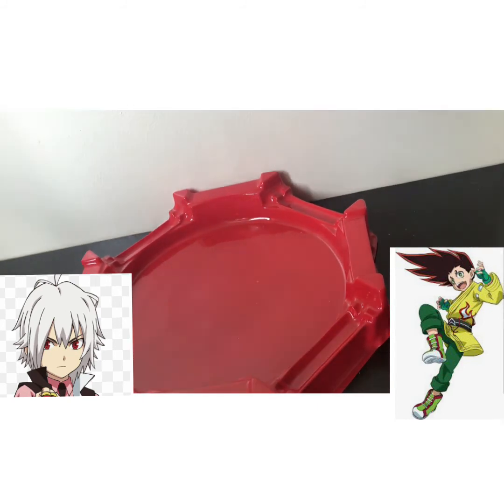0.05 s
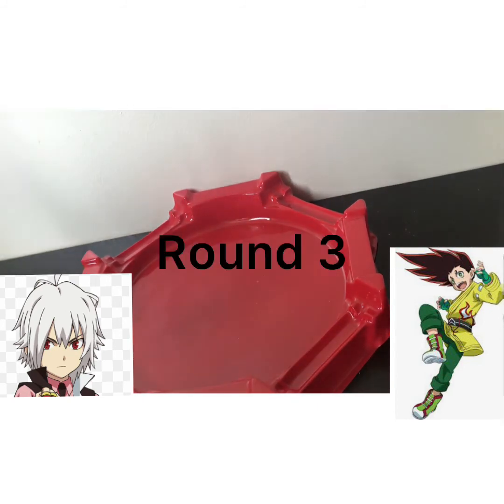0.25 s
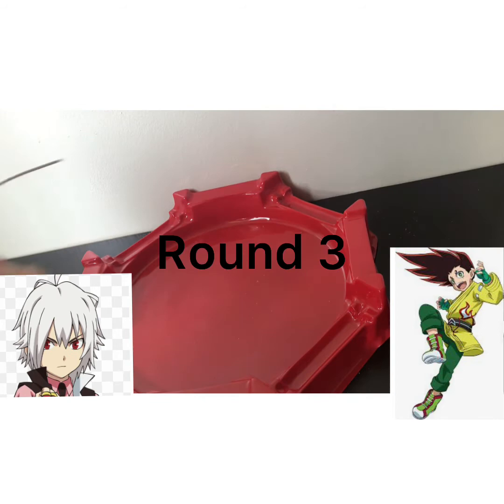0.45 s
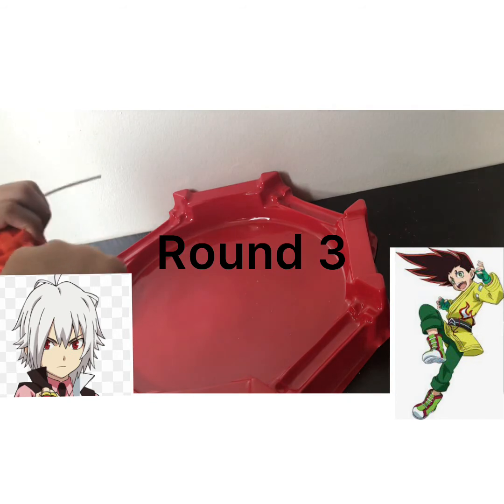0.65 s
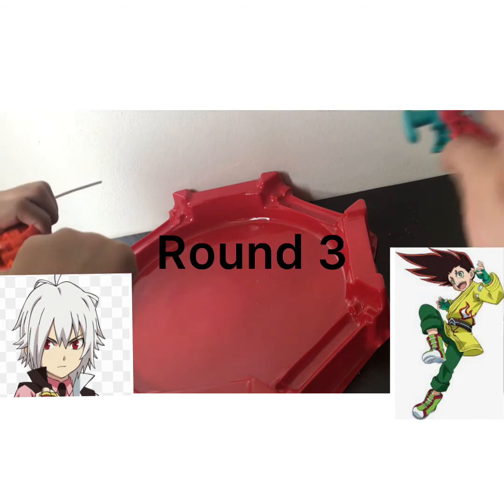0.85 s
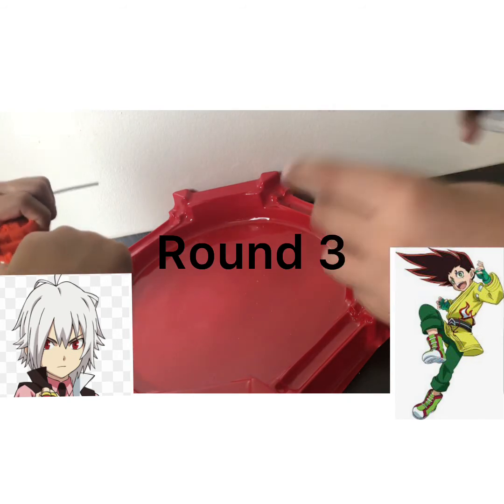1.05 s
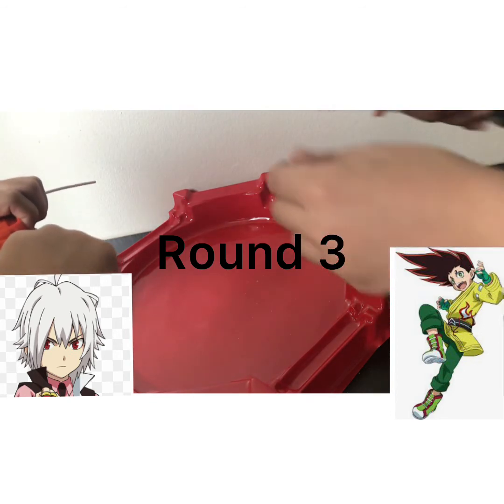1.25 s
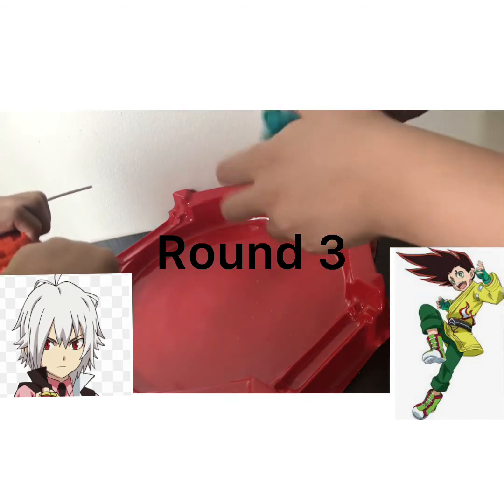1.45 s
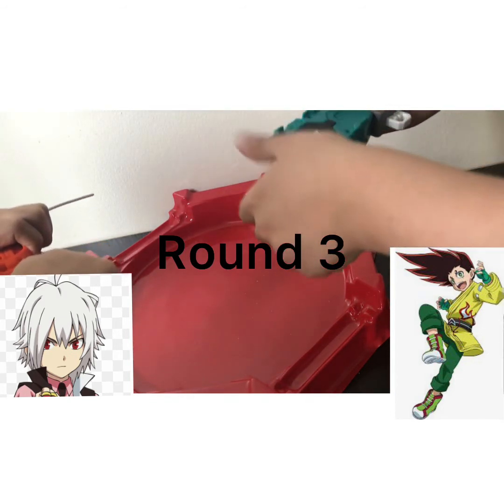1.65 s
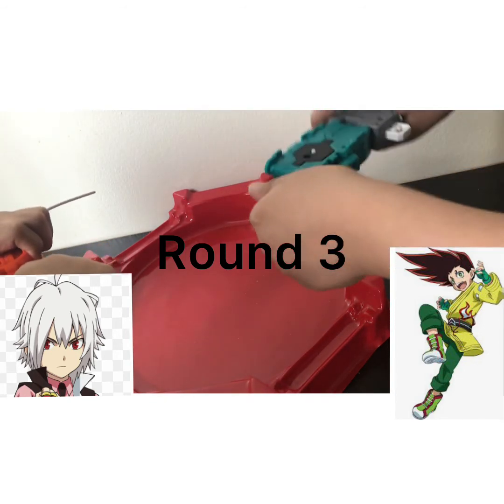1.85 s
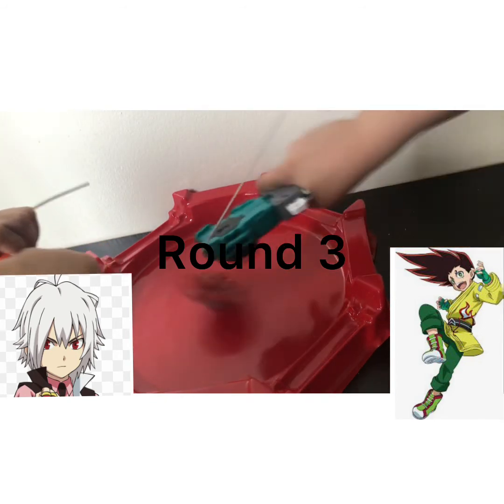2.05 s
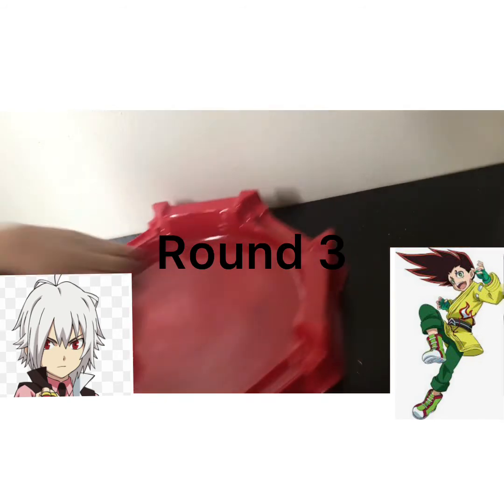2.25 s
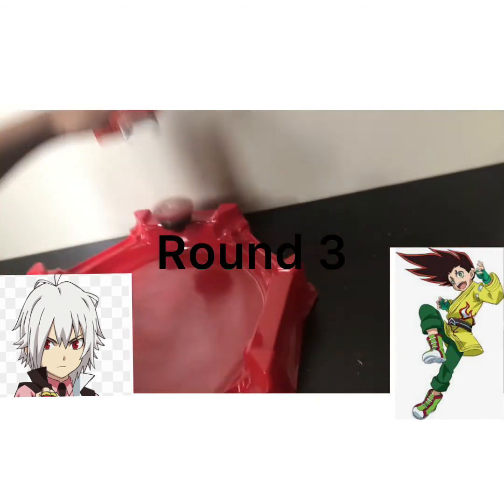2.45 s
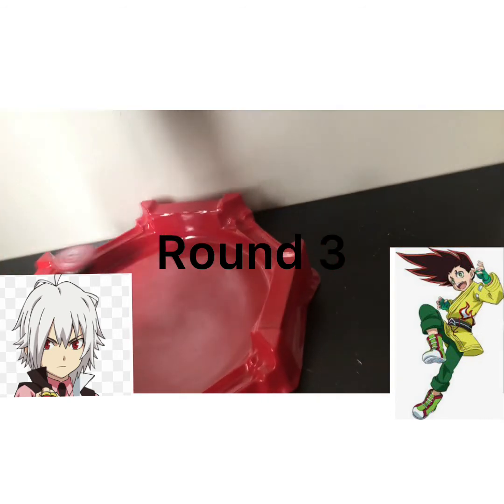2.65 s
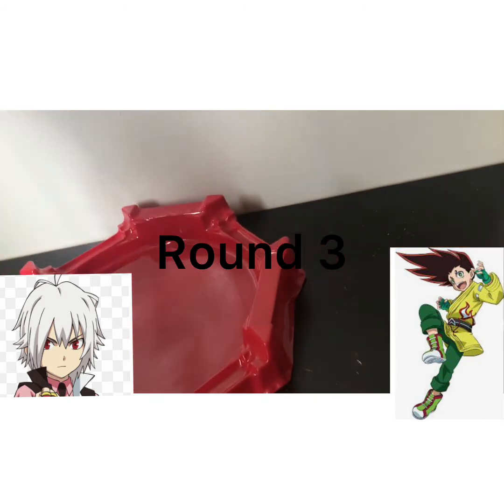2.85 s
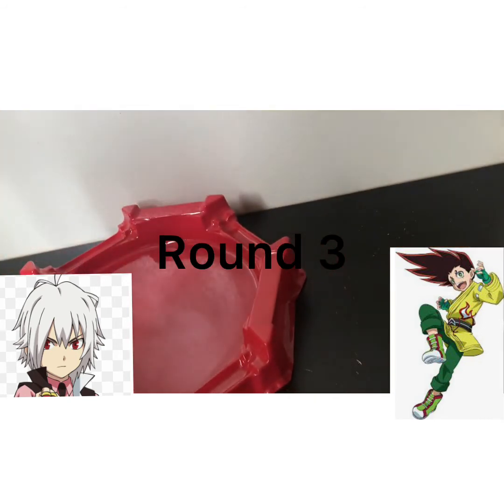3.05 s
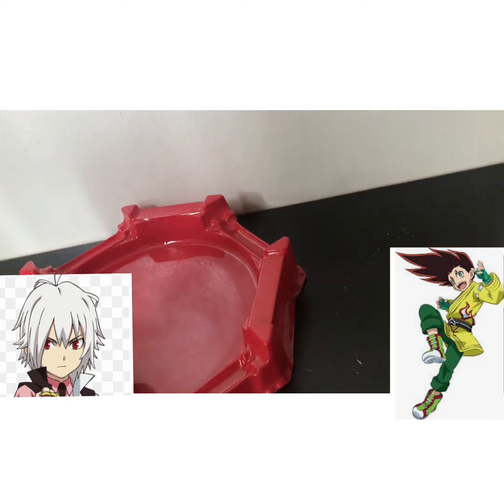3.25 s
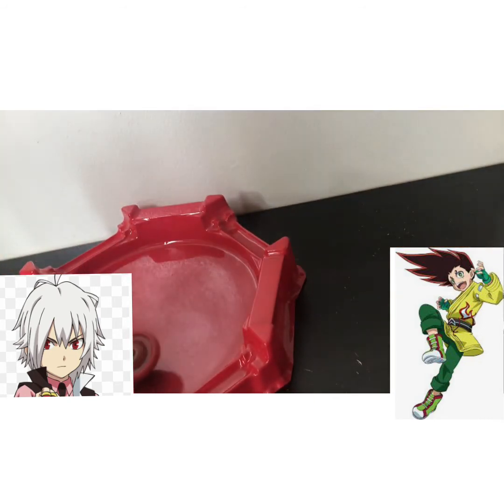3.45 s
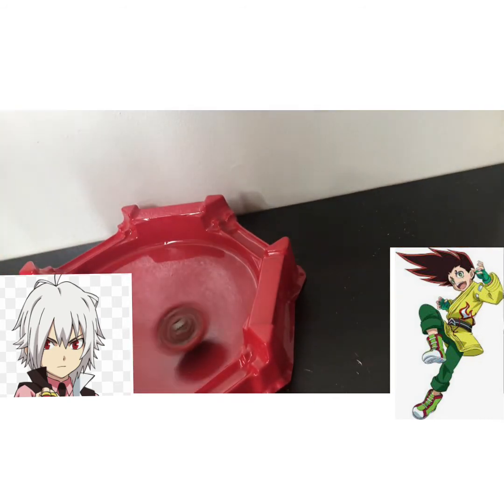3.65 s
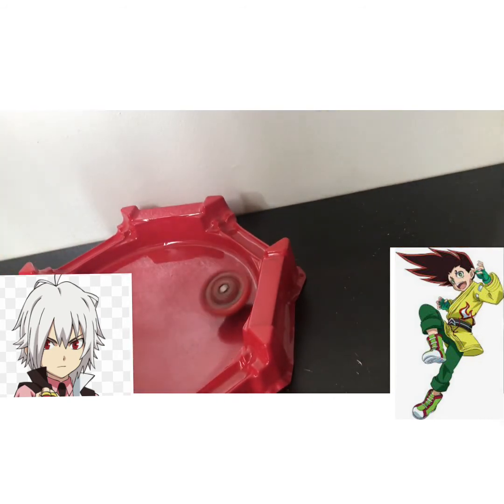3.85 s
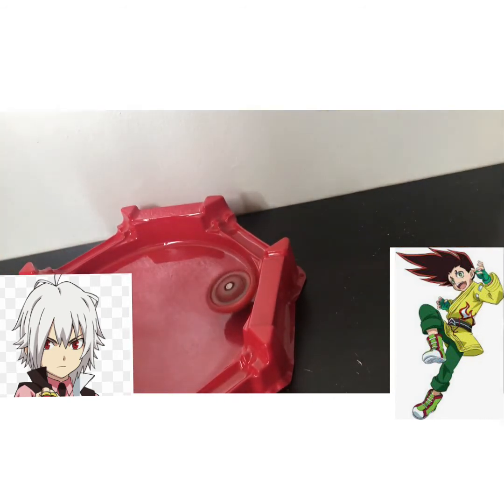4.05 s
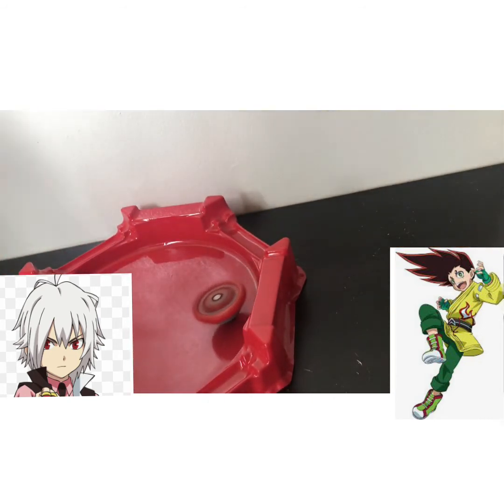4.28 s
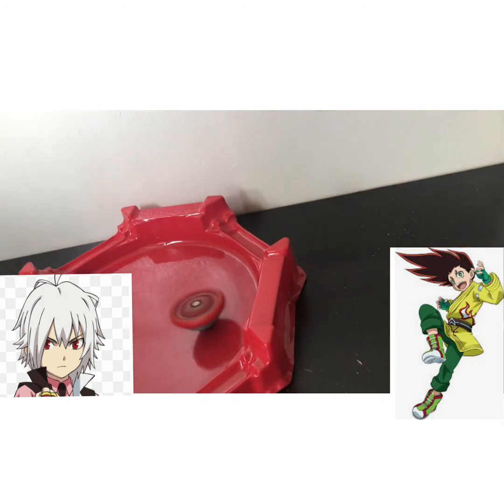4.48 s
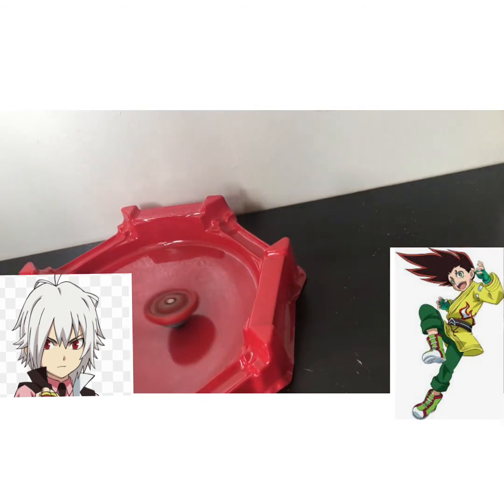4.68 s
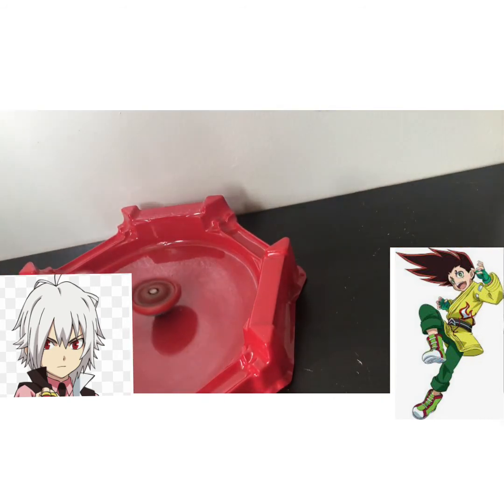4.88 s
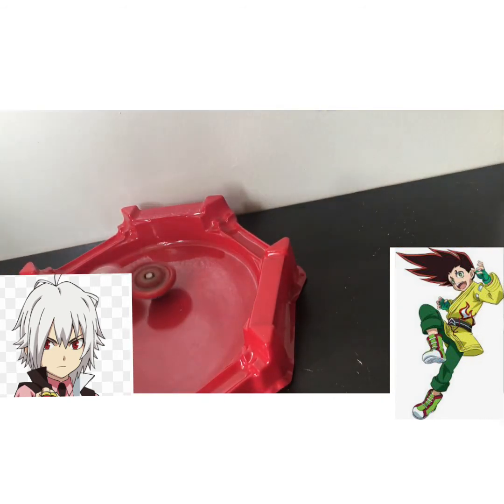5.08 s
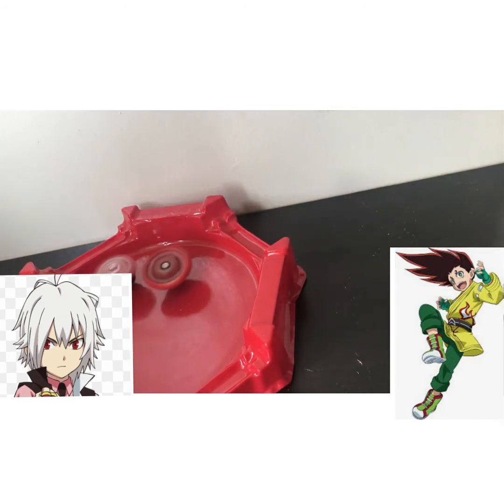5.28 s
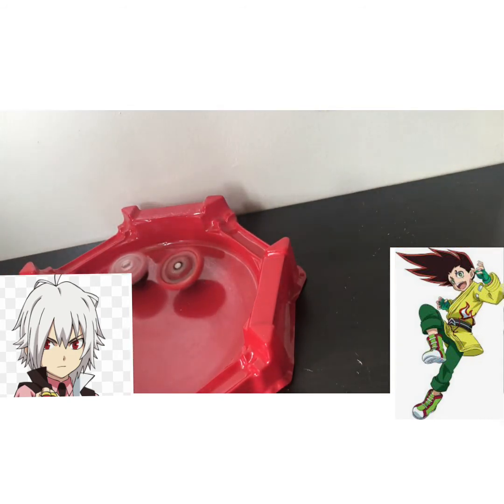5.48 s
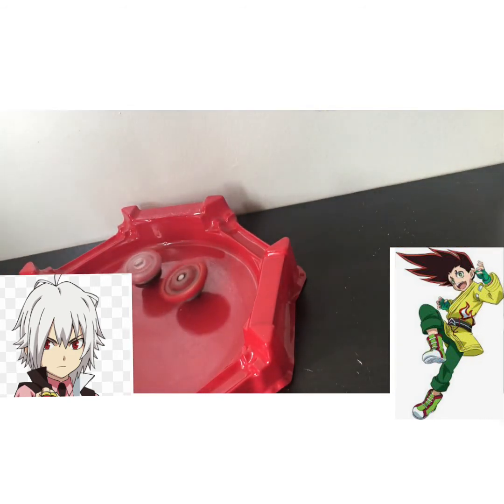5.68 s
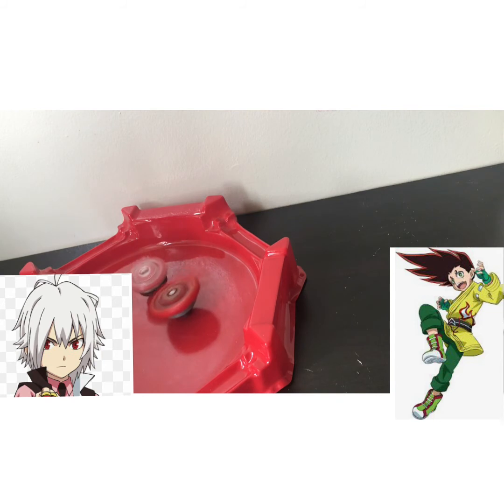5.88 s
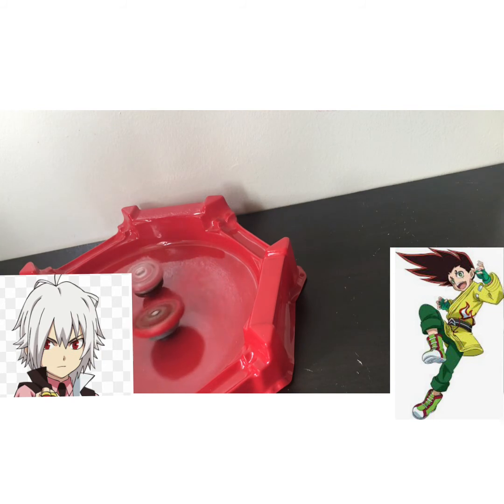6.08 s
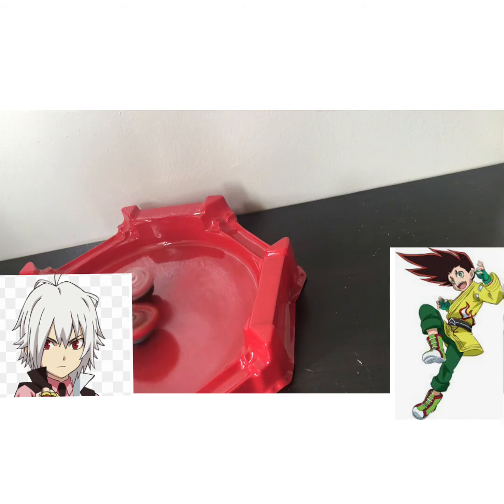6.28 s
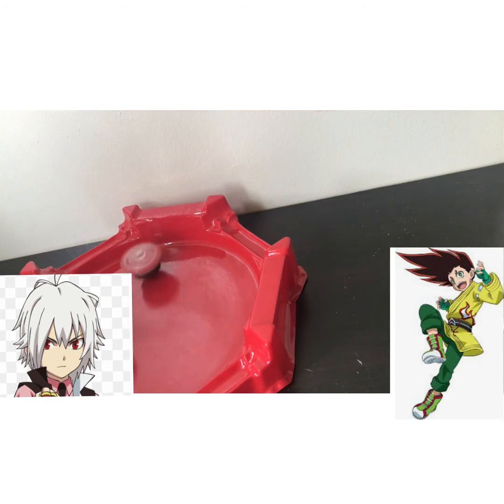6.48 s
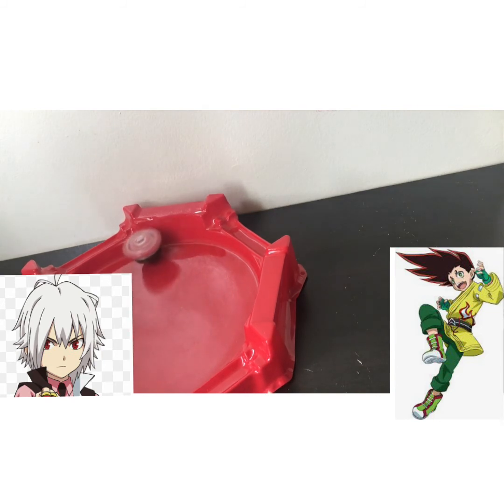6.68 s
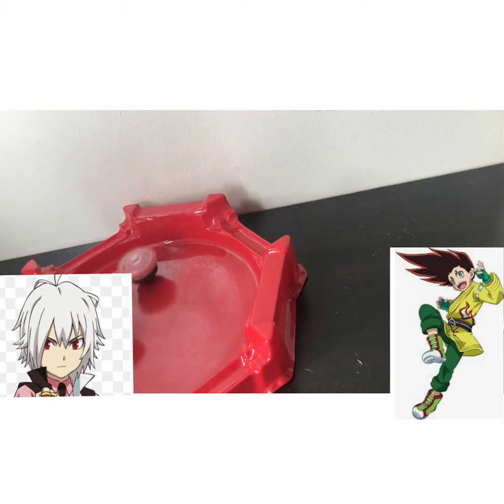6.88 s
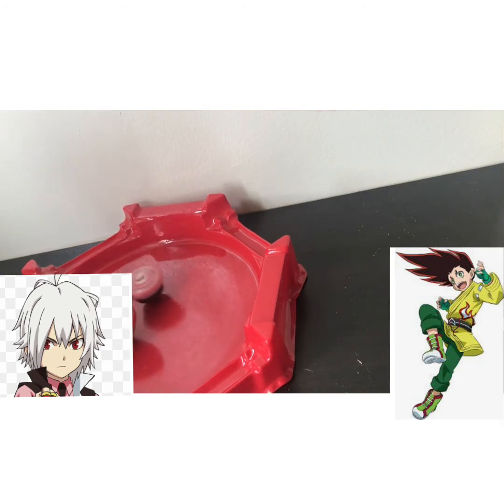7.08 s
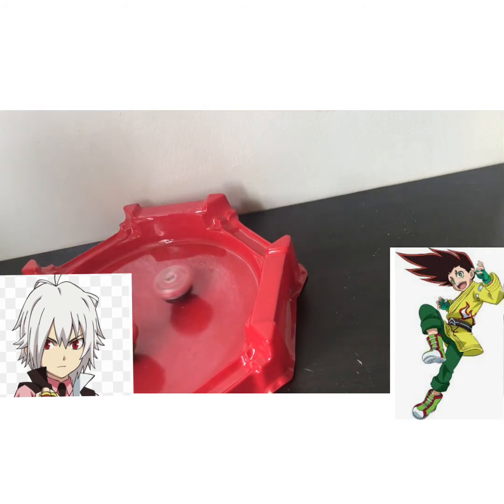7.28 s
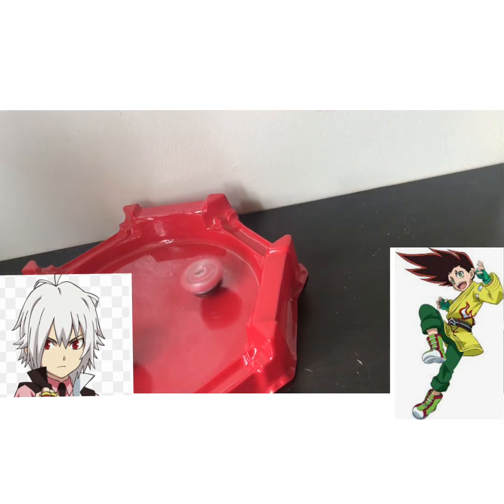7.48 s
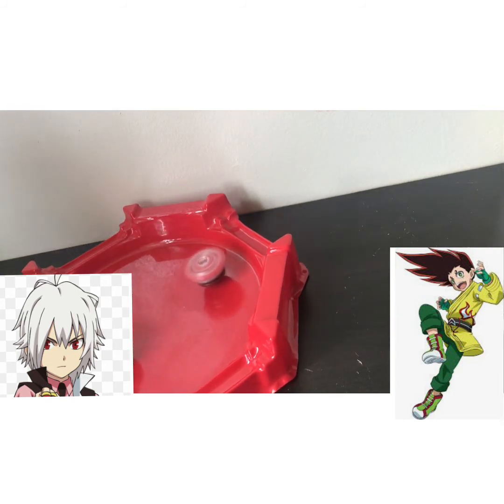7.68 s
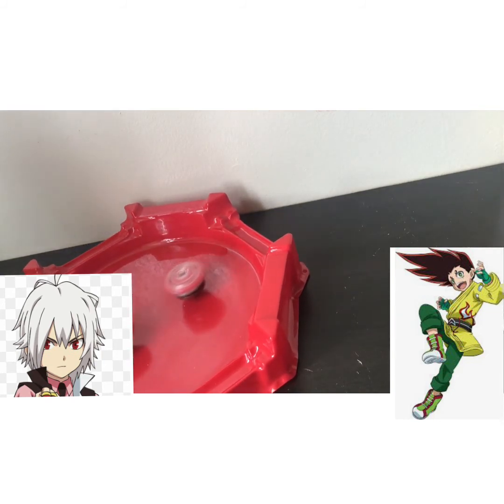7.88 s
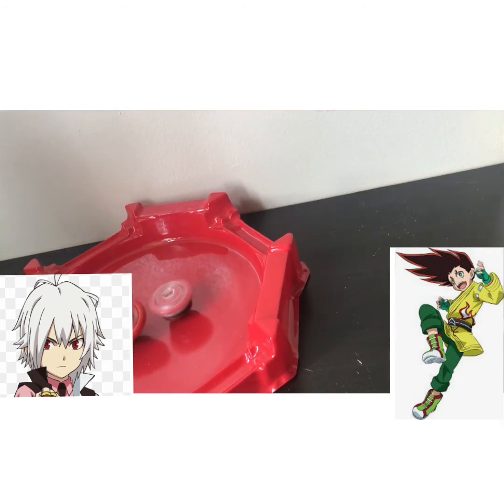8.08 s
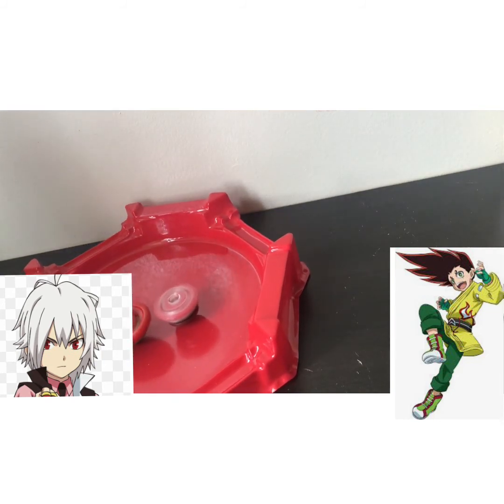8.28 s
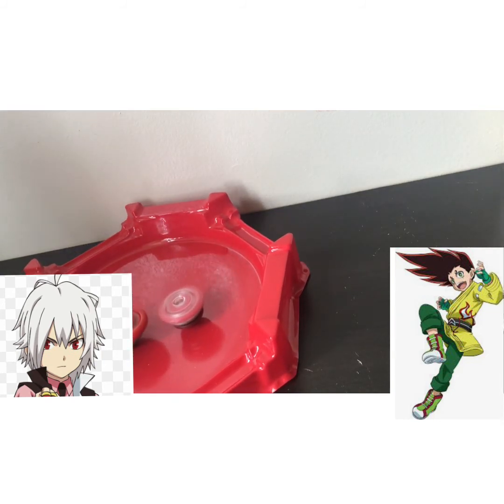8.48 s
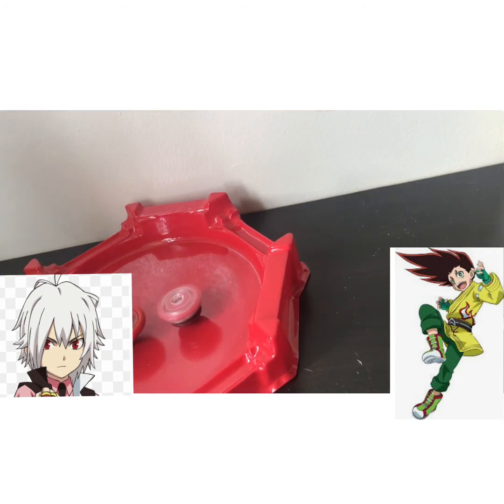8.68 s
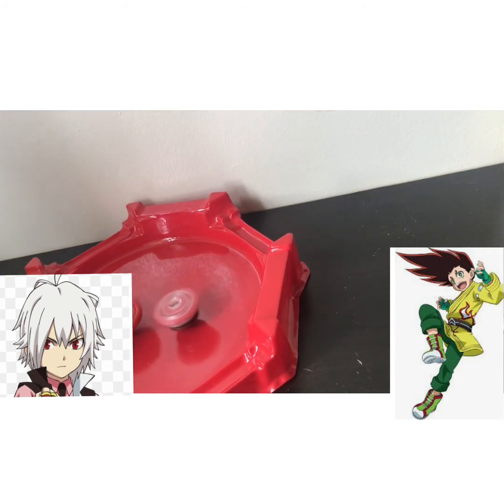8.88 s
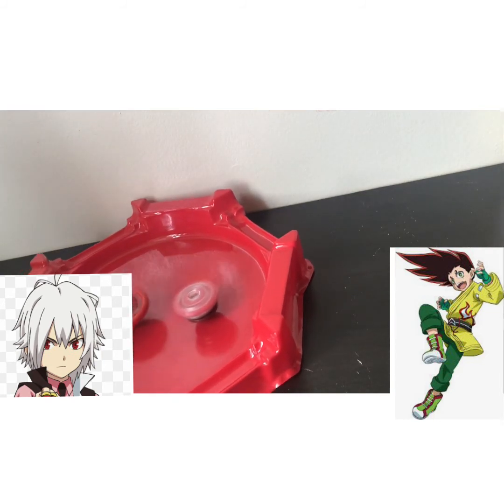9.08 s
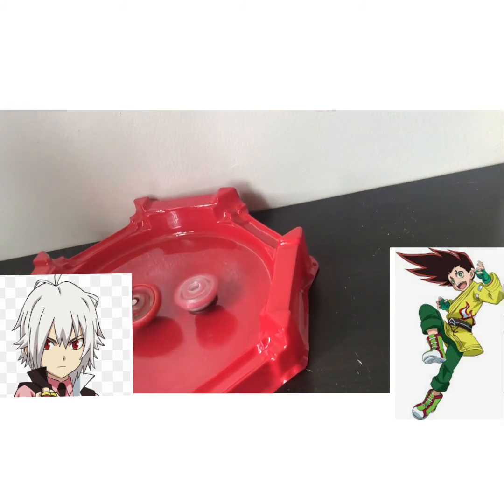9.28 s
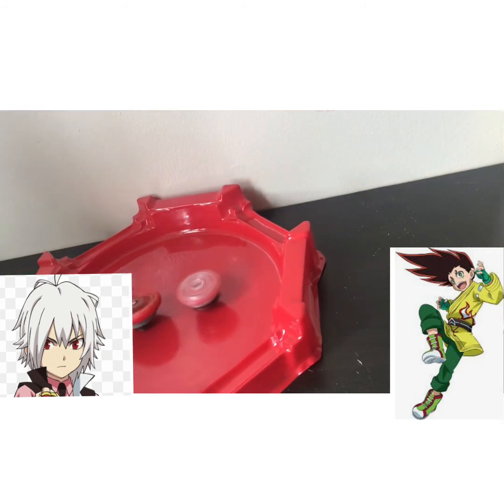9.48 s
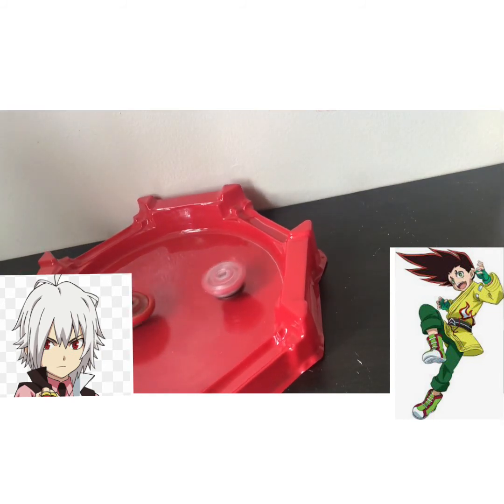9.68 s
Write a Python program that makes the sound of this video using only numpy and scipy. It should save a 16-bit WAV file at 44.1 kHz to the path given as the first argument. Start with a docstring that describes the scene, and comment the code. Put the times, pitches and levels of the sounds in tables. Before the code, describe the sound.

Brief plastic squeaks, loud zipping gear rips and a burst of hard knocks, followed by spaced, bright clashes and fine ticking of tops.

```python
"""Battling spinning tops

Two plastic tops in a thin plastic arena on a table, heard up close through a phone in a small quiet room.
A launcher squeaks as it is wound (gliding tones) and two launchers rip (bursts of clicks from gear teeth).
The tops land, clash and knock the rim: short noise pushes make the top, the arena and the table ring.
Wobbling tops tick once a turn, rubbing plastic drones and hisses, and soft room noise lies underneath."""
import sys
import numpy as np
from scipy import signal
from scipy.fft import rfft, irfft
from scipy.io import wavfile
from scipy.ndimage import uniform_filter1d

SR = 44100
rng = np.random.default_rng(int(sys.argv[2]) if len(sys.argv) > 2 else 0)


def digitize_waveform(pressure):
    """Quantize a signal to 16-bit integers and store it at the path in sys.argv[1].

    Rows of a 2-D input are taken as channels; values are limited to [-1, 1].
    """
    field = np.atleast_2d(pressure).T
    bounded = np.clip(field, -1, 1)
    quanta = np.round(bounded * 32767).astype(np.int16)
    wavfile.write(sys.argv[1], SR, quanta)


N = 429534  # length in samples


def undb(db):
    """Turns decibels into an amplitude factor."""
    return 10 ** (np.asarray(db) / 20)


def level(x, db):
    """Sets the average (RMS) level of a sound."""
    return x * undb(db) / np.sqrt(np.mean(x ** 2))


def colour(x, points):
    """Makes some pitches stronger than others, following (frequency [Hz], level [dB]) points."""
    hz, db = np.transpose(points)
    f = np.maximum(np.arange(len(x) // 2 + 1) * SR / len(x), 1)
    gain = undb(np.interp(np.log(f), np.log(hz), db))
    return irfft(rfft(x) * gain, len(x))


def walk(rate):
    """Wandering random curve: a new value every 1 / rate seconds, with the steps smoothed twice."""
    k = int(SR / rate)
    steps = np.repeat(rng.standard_normal(N // k + 1), k)
    return uniform_filter1d(uniform_filter1d(steps, k), k)[:N]


def decay(t, t60):
    """Dying away by 60 dB in t60 seconds."""
    return np.exp(-np.log(1000) * t / t60)


def bandpass(x, low_hz, high_hz):
    """Keeps the sound between two frequencies."""
    return signal.sosfilt(signal.butter(2, [low_hz, high_hz], "band", fs=SR, output="sos"), x)


def add(out, s, sound, peak_db):
    """Adds a sound at s seconds, scaled to the given peak level."""
    i = int(s * SR)
    scaled = sound * undb(peak_db) / np.abs(sound).max()
    out[i:i + len(sound)] += scaled[:len(out) - i]


# tone of the quiet room: (frequency [Hz], relative level [dB])
AIR = [(12, -51.5), (20, -20.5), (49, -14.5), (86, -3), (168, -15), (182, -31), (228, -14), (328, -23.5),
       (367, -27), (499, -30), (718, -28.5), (849, -41.5), (2320, -45.5), (16000, -58)]
AIR_DB = -51.5  # average level


def air():
    """Steady room tone: random noise coloured to be strongest in the bass."""
    return level(colour(rng.standard_normal(N), AIR), AIR_DB)


# echo of the room: (centre of the band [Hz], time to fall 60 dB [s], echo level [dB])
ROOM = [(150, .33, -8), (500, 0.21, -7), (1450, 0.18, -9.5), (3717, 0.34, -10.5), (9700, 0.13, -9.5)]


def room(x):
    """Blurred echo off the room: noise in several bands, each dying at its own pace, fading in at the start."""
    t = np.arange(SR // 2) / SR
    octave = np.log2(np.maximum(np.arange(len(t) // 2 + 1) * SR / len(t), 1))
    centres = np.log2(np.array(ROOM)[:, 0])
    echo = 0
    for share, (_, t60, db) in zip(np.eye(len(ROOM)), ROOM):
        # neighbouring bands cross-fade at constant power
        weight = np.sqrt(np.interp(octave, centres, share))
        band = irfft(rfft(rng.standard_normal(len(t))) * weight, len(t))
        # the last factor keeps a long echo from being louder overall than a short one
        echo = echo + undb(db) * band * decay(t, t60) / np.sqrt(t60 * SR / 14)
    fade_in = np.clip(t / 0.0036 - .3, 0, 1)
    return signal.fftconvolve(x, echo * fade_in)[:N]


# rough tail after a blow: start level against the blow in the arena (drone) and in the top (hiss),
# time to fall 60 dB
TAIL_DRONE_DB, TAIL_HISS_DB, TAIL_T60_S = -26.5, -38.5, 0.36


def rough_tail(column, below_db):
    """Strength of the rough tail after each blow: low drone and hiss that die away with the blow."""
    out = np.zeros(N)
    fade = decay(np.arange(SR) / SR, TAIL_T60_S)
    for blow in BLOWS:
        add(out, blow[0], fade, blow[column] + below_db)
    return uniform_filter1d(out, size=400)  # softens the start over about 9 ms


# tips and hands rubbing on plastic: (time [s], drone in the shell [dB], hiss [dB])
RUBBING = [(0, -58, -58), (.35, -60.5, -55), (.7, -62, -55), (.89, -67.5, -65), (1.36, -58.5, -60),
           (1.52, -72, -71), (1.85, -60, -60), (2.55, -42, -37), (2.9, -48.5, -59.5), (3.4, -61.5, -62),
           (4.37, -61.5, -58.5), (5.07, -55, -56.5), (5.5, -61, -63.5), (5.81, -46.5, -57),
           (5.97, -64, -62.5), (6.54, -58, -57.5), (7.32, -60, -65), (8.65, -67, -68.5), (8.95, -53, -61),
           (9.44, -57.5, -61.5), (9.74, -61, -65)]
# drone of the arena shell: (frequency [Hz], relative level [dB])
ROLLING = [(210, -43), (350, -8), (645, -5.5), (958, 2.5), (2170, -9.5), (2290, -13.5), (2480, -13),
           (3000, -14.5), (3900, -42), (6600, -120)]
# hiss of the plastic: (frequency [Hz], relative level [dB])
HISS = [(880, -31.5), (1500, 2), (2080, -7.5), (3350, -1.5), (4920, -5), (5600, -3.5), (8660, -7.5),
        (12900, -12.5), (16000, -25.5)]


def rubbing_and_tails():
    """Rubbing shakes the shell in grains and hisses; the rough tails of the blows share this drone and hiss."""
    s, drone_db, hiss_db = np.transpose(RUBBING)
    t = np.arange(N) / SR
    grains = rng.standard_normal(N) * undb(4.5 * walk(70))
    drone = level(colour(grains, ROLLING), 0)
    flutter = rng.standard_normal(N) * undb(2.0 * walk(90))
    hiss = level(colour(flutter, HISS), 0)
    # the drone tail follows the arena level of each blow, the hiss tail the level of the top
    drone_strength = undb(np.interp(t, s, drone_db)) + rough_tail(column=5, below_db=TAIL_DRONE_DB)
    hiss_strength = undb(np.interp(t, s, hiss_db)) + rough_tail(column=1, below_db=TAIL_HISS_DB)
    return drone * drone_strength + hiss * hiss_strength


# strokes of the gear teeth: (start of full strength [s], hold [s], rise over 20 dB [s], fall over 20 dB [s],
# level [dB], change of the low part [dB])
RASPS = [(0.433, .04, .04, 0.0059, -35, -4), (.57, .015, 0.049, 0.02, -27.5, -12),
         (0.63, .01, .02, 0.045, -42.5, -7), (0.69, .015, 0.041, 0.04, -33.5, 1.5),
         (1.926, .045, 0.057, 0.0362, -18.5, 0.5), (2.167, .004, .015, 0.04, -17.5, 3.5),
         (2.197, .03, 0.017, 0.0472, -17.5, -1.5), (2.237, .05, 0.011, 0.0771, -5, 0.5)]
# ring of the launcher case: (frequency [Hz], relative level [dB])
GEARS = [(240, -48.5), (400, -14), (697, -19.5), (765, -14), (964, -19.5), (1140, -14), (1250, -17),
         (3070, -7), (3420, -6), (12100, -6), (16000, -17)]


def rasps():
    """Thousands of uneven tooth clicks a second ring the launcher case; each stroke swells, holds and dies."""
    is_click = rng.random(N) < .14  # share of samples that hold a click
    clicks = rng.standard_normal(N) * is_click * undb(3.5 * walk(300))
    whole = level(colour(clicks, GEARS), 0)
    low = colour(whole, [(1500, 0), (3000, -40)])
    t, out = np.arange(N) / SR, 0
    for s, hold, rise, fall, db, low_db in RASPS:
        # 0 while held, growing before and after; each 1 means 20 dB softer
        away = np.maximum(np.maximum((s - t) / rise, (t - s - hold) / fall), 0)
        stroke = whole + (undb(low_db) - 1) * low
        out = out + undb(db - 20 * away) * stroke
    return out


# plastic squeaking on plastic: (start [s], end [s], start pitch [Hz], end pitch [Hz], lowest tone [dB],
# overtones [dB], brightest overtone [Hz])
SQUEAKS = [(.36, .383, 9200, 9400, -35, -70, 9000), (.373, 0.413, 8900, 4200, -45.5, -56, 11900),
           (0.425, .468, 1950, 3700, -37, -34, 9500), (.489, .52, 3500, 2700, -52, -37, 9100),
           (.525, 0.572, 2730, 3300, -42, -36, 7500), (.565, .584, 2740, 2740, -48, -20.5, 8100),
           (0.568, .586, 3660, 2690, -36.5, -50, 9000), (.586, .622, 2740, 2770, -58, -47, 8300),
           (0.628, 0.653, 4460, 4480, -38, -32.5, 9000), (0.653, .685, 3300, 2620, -55, -38, 5800),
           (0.663, 0.691, 2600, 2660, -38.5, -55, 6000), (0.673, 0.725, 2320, 1940, -37.5, -40, 6200),
           (1.86, 1.883, 11000, 11400, -22.5, -90, 9000)]
WAVER_HZ = 110.6  # pitch shift for a random curve value of 1
OVERTONE_DB_PER_OCTAVE = 19  # overtones weaken this fast away from the brightest one


def squeaks():
    """Fast sticking and slipping at two contact spots: gliding stacks of tones that waver and stutter."""
    out, k = np.zeros(N), np.arange(1, 5)[:, None]  # k numbers the four tones of a stack
    for spot in range(2):
        waver, stutter = walk(900) + .6 * walk(150), walk(350)
        for s0, s1, hz0, hz1, first_db, over_db, bright_hz in SQUEAKS:
            i = np.arange(int(s0 * SR), int(s1 * SR))
            hz = np.geomspace(hz0, hz1, len(i)) + WAVER_HZ * waver[i]
            octaves_off = np.abs(np.log2(k * hz / bright_hz))
            db = np.where(k == 1, first_db, over_db - OVERTONE_DB_PER_OCTAVE * octaves_off)
            tones = np.sin(k * 2 * np.pi * np.cumsum(hz) / SR)
            audible = k * hz < .4 * SR  # leaves out tones too high to play cleanly
            stack = np.sum(undb(db) * audible * tones, axis=0)
            strength = undb(6.0 * stutter[i])
            strength /= np.sqrt(np.mean(strength ** 2))
            out[i] += stack * strength * signal.windows.tukey(len(i), .3)
    return out


def contact(noise, ms, rattle_db, rattle_ms):
    """Scraping push of a spinning rim: quick rise, then it lets go while loose parts rattle on."""
    t = np.arange(len(noise)) / SR * 1000  # in ms
    rise = 1 - np.exp(-t / 0.72)
    return noise * rise * (np.exp(-t / ms) + undb(rattle_db) * np.exp(-t / rattle_ms))


def crack(push, best_hz, treble_db, focus_db):
    """Snap of hard plastic: broad noise with more or less treble and one heavily damped resonance."""
    snap = bandpass(push, 2300, 15000)
    dull = signal.sosfilt(signal.butter(2, 6500, fs=SR, output="sos"), snap)
    peak = signal.lfilter(*signal.iirpeak(best_hz, 9.0, fs=SR), push)
    middle, treble = dull + undb(focus_db) * peak, snap - dull
    return middle / np.abs(middle).max() + undb(treble_db) * treble / np.abs(treble).max()


# single light ticks of loose parts and rims: (time [s], peak level [dB], ring [Hz])
TICKS = [(.2655, -35, 6240), (.315, -27, 5960), (.323, -29.5, 4020), (.3385, -32, 5300),
         (.595, -18.5, 2900), (0.8752, -34.5, 3050), (0.8842, -33.5, 3000), (1.4451, -41, 3850),
         (1.7068, -37, 2580), (1.8522, -27, 4000), (2.502, -14, 3800), (2.5408, -18, 6500),
         (2.5516, -23, 3470), (2.7613, -13, 8550), (3.518, -38, 9180), (3.747, -36, 2640),
         (3.8583, -39, 3630), (4.8375, -39, 4480), (4.8833, -39.5, 5640), (4.9044, -44, 3070),
         (5.2144, -43, 8300), (5.504, -29, 3900), (5.524, -38, 3140), (5.678, -33, 4030),
         (5.7603, -37, 4150), (5.792, -38, 3200), (6.0286, -35, 5720), (6.0775, -43, 4580),
         (6.116, -35, 6470), (6.1906, -39, 4890), (6.2282, -42, 3050), (6.574, -33, 4470),
         (8.1077, -30, 4635), (9.5527, -28.5, 8500), (9.6257, -40.5, 4710), (9.733, -43, 5000),
         (6.8184, -31, 6600), (6.247, -43, 4700), (5.657, -42, 8500)]
# a lug on the rim of a wobbling top ticks once a turn: (first tick [s], end [s], time of a turn [s],
# first level [dB], last level [dB], ring [Hz])
WOBBLES = [(3.9938, 4.35, .0475, -29, -40, 5250), (6.686, 6.97, .0663, -45, -32, 6240),
           (6.726, 6.95, 0.064, -49, -39, 8500), (7.2914, 7.902, .0722, -38.5, -42.5, 8710),
           (7.3205, 7.93, 0.072, -40, -34, 4620), (8.462, 8.72, .0808, -46, -43.5, 5800),
           (9.093, 9.28, 0.083, -48, -44, 3700), (9.133, 9.32, 0.088, -46, -48, 4300)]
TICK_TREBLE_DB, WOBBLE_TREBLE_DB = -5.5, 1.5  # treble against the middle of the sound
WOBBLE_SCATTER_DB = 2.5  # random spread of level from tick to tick


def ticks():
    """Short dry touches that hardly move the shell: single ones, and runs of uneven strength, one per turn."""
    out = np.zeros(N)
    rows = [(*row, TICK_TREBLE_DB) for row in TICKS]
    for first, end, turn, db0, db1, hz in WOBBLES:
        scatter = WOBBLE_SCATTER_DB * rng.standard_normal(16)
        for s, extra_db in zip(np.arange(first, end, turn), scatter):
            db = db0 + (db1 - db0) * (s - first) / (end - first)
            rows.append((s, db + extra_db, hz, WOBBLE_TREBLE_DB))
    for s, db, best_hz, treble_db in rows:
        push = contact(rng.standard_normal(2048), 2.4, rattle_db=-14.5, rattle_ms=14)
        add(out, s, crack(push, best_hz, treble_db, focus_db=6), db)
    return out


BLOW_TIME = np.arange(SR // 6) / SR  # time axis of one blow [s]


def ring(modes, spread, best_hz, focus_db, noise):
    """Ring of a body: moulded plastic splits each mode into a cluster of close tones that beat unevenly."""
    hz, db, t60 = (c[:, None] for c in np.transpose(modes))
    f = np.arange(len(BLOW_TIME) // 2 + 1) * SR / len(BLOW_TIME)
    near_mode = np.exp(-((f - hz) / (spread * hz)) ** 2)
    clusters = irfft(rfft(noise) * near_mode, len(BLOW_TIME))
    clusters /= clusters.std(axis=1, keepdims=True)
    # the modes near best_hz are struck hardest
    gain = undb(db + focus_db * np.exp(-(np.log(hz / best_hz) / .1) ** 2))
    return np.sum(gain * clusters * decay(BLOW_TIME, t60), axis=0)


def body(push, response, low_hz, high_hz, knock_db):
    """A struck body: a short broad knock and the ring of its modes."""
    sound = signal.fftconvolve(push, response)
    knock = bandpass(push, low_hz, high_hz)
    sound[:len(push)] += undb(knock_db) * knock * np.abs(sound).max() / np.abs(knock).max()
    return sound


# blows: (time [s], peak of the top [dB], ring of the top [Hz], treble against the middle [dB],
# ring of the top against its peak [dB], arena peak [dB], arena ring [Hz], table thud peak [dB])
BLOWS = [(1.3292, -59, 2690, -16, -20, -56, 482, -36), (1.41, -55, 2790, -16, -20, -48, 565, -35.5),
         (1.809, -35.5, 3900, -15, -12.5, -57.5, 537, -36.5),
         (1.9315, -4.5, 3230, -15.5, -25, -30, 1900, -58),
         (1.9648, 0.5, 3160, -12, -14.5, -17.5, 2310, -38), (2.001, 1.5, 9060, -5.5, -21.5, -5, 546, -5),
         (2.1022, 1, 2750, -6, -22, 4.5, 1270, -25), (2.2405, -1, 3400, -6, -15.5, -9.5, 870, -40),
         (2.2691, 3, 8750, 1.5, -23.5, -1, 960, -23), (2.4169, -10, 2740, -9, -13.5, 2, 1100, -53),
         (2.4718, -1.5, 6950, 3.5, -19, -21, 1070, -49), (2.614, -1, 5000, -8, -27.5, -9.5, 1520, -24),
         (2.6493, -14.5, 2570, -23, -25.5, -14.5, 1020, -44),
         (2.6634, -15.5, 3300, -21, -2, -10.5, 2050, -46), (2.6806, -24, 3100, -5, -27.5, -16, 1200, -39),
         (2.7493, -11.5, 2700, -5.5, -13.5, -5.5, 1170, -24.5), (3.041, -12, 8280, 3.5, -9, -47, 1170, -36),
         (3.1028, -8.5, 4200, -10, -30, -17, 1480, -46), (3.118, -14, 2870, -8, -26, -19, 1510, -26),
         (3.3093, -6, 9000, 2.5, -18, -25, 1840, -39), (3.5425, 4.5, 9570, 1, -13.5, -26.5, 2480, -33),
         (3.6438, -15, 2780, -23, -17, -1, 950, -23), (3.912, -16, 6900, -6, -20, -13, 1624, -28.5),
         (5.0653, -0.5, 4180, -1.5, -12, -23.5, 1930, -37.5),
         (5.6925, -26.5, 3830, -9, -7, -39, 2110, -49.5), (5.875, -15, 8000, -10, -7, -24, 2380, -54),
         (5.8821, -4.5, 5800, 4.5, -20, -31, 1980, -39), (6.289, -14.5, 6220, 1, -25.5, -31, 1460, -53),
         (6.2968, 3.5, 9360, 2.5, -11.5, -14, 2570, -18), (6.36, -32, 5000, -10, -20, -31, 436, -25),
         (6.5988, -6.5, 3000, -0.5, -24, -7, 1170, -23.5), (6.984, -9, 11750, -12, -6, -42, 1560, -29.5),
         (7.007, -3.5, 12100, 6.5, -26, -23.5, 2480, -29), (7.136, -20, 3660, -8, -11, -22.5, 936, -27.5),
         (7.9748, -34, 2790, -4, -19.5, -30.5, 920, -37), (8.0183, -3.5, 11100, 7, -14, -30, 1950, -62),
         (8.3375, -11, 3400, 1, -16, -32, 2500, -44.5), (8.773, -18, 8700, 3, -16, -35.5, 1460, -39),
         (8.7827, -5, 10000, 2, -15, -25.5, 2005, -45.5), (9.2695, -43.5, 4650, -8, -20, -33.5, 963, -41.5),
         (9.3461, -12.5, 7100, 3, -15, -28.5, 2360, -57), (9.361, -14.5, 5000, 2, -25, -44, 2300, -56),
         (9.3982, -2.5, 4550, 9, -24.5, -29.5, 2500, -38)]
# modes (natural tones) of a top: (frequency [Hz], level [dB], time to fall 60 dB [s])
TOP = [(2900, -3.5, 0.084), (3376, -0.5, 0.11), (4270, -8, .22), (4600, -0.5, 0.11), (5800, -1, 0.14),
       (6540, -2.5, 0.061), (6960, -2.5, 0.07), (8500, 1.5, .08), (8900, -2, 0.12), (9700, -1, 0.097),
       (11720, -0.5, 0.053), (13000, -1, .12)]
# modes of the arena shell: (frequency [Hz], level [dB], time to fall 60 dB [s])
ARENA = [(432, -22.5, 0.15), (561, -13, 0.061), (670, -12, 0.17), (864, -7, 0.17), (990, -3, 0.042),
         (1105, -5, 0.14), (1270, 3, 0.043), (1487, 0, 0.076), (1830, -9, 0.09), (2040, -1, 0.024),
         (2350, -1.5, 0.013)]
# modes of the table: (frequency [Hz], level [dB], time to fall 60 dB [s])
TABLE = [(116, -13, .15), (149.7, 3.5, 0.18), (249, -12.5, 0.047), (290, -16, 0.3)]
CONTACT_MS = 3.22  # time constant of the push letting go


def blows():
    """Every blow sounds in the top, the arena shell and the table under it."""
    out = np.zeros(N)
    for s, top_db, top_hz, treble_db, ring_db, arena_db, arena_hz, thud_db in BLOWS:
        scrape, grain = rng.standard_normal((2, len(BLOW_TIME)))
        push = contact(scrape, CONTACT_MS, rattle_db=-24, rattle_ms=29)
        top_ring = signal.fftconvolve(push, ring(TOP, 0.033, top_hz, 13, grain))
        arena = body(push, ring(ARENA, .09, arena_hz, 8, grain), 490, 2800, knock_db=2)
        thud = body(push, ring(TABLE, .08, 152, 3, grain), 140, 650, knock_db=6)
        add(out, s, crack(push, top_hz, treble_db, focus_db=0.5), top_db)
        add(out, s, top_ring, top_db + ring_db)
        add(out, s, arena, arena_db)
        add(out, s, thud, thud_db)
    return out


def scene():
    """Mixes all layers; blows, ticks, squeaks and rasps also echo in the room."""
    events = rasps() + squeaks() + ticks() + blows()
    # small bodies radiate no deep bass
    events = signal.sosfilt(signal.butter(4, 115, "high", fs=SR, output="sos"), events)
    return (air() + rubbing_and_tails() + room(events) + events)[None]


def record(dry):
    """The phone rounds the loudest peaks and cuts the top of the treble."""
    rounded = .9 * np.tanh(dry / .9)
    return signal.sosfilt(signal.ellip(10, .2, 90, 15900, fs=SR, output="sos"), rounded)  # cut at 15900 Hz


dry = scene()
out = record(dry)
digitize_waveform(out)
```